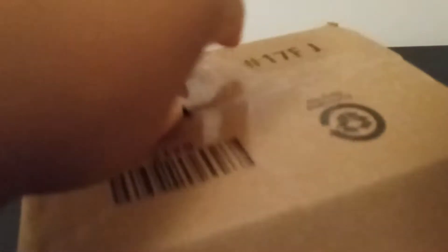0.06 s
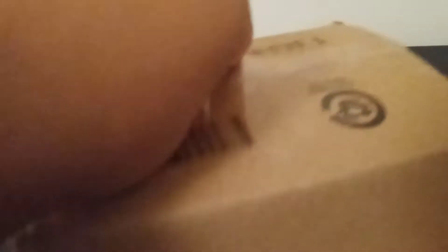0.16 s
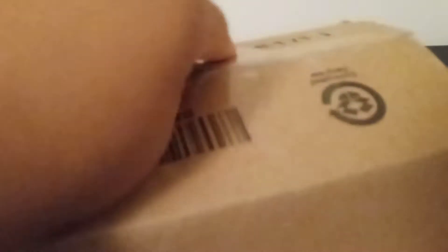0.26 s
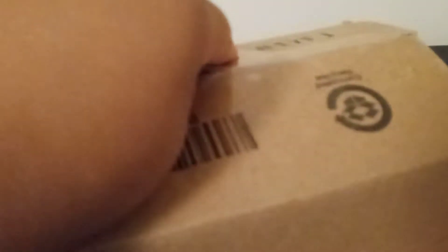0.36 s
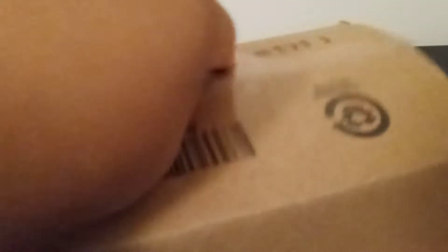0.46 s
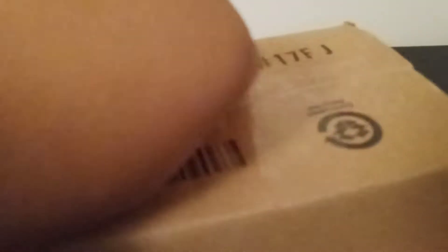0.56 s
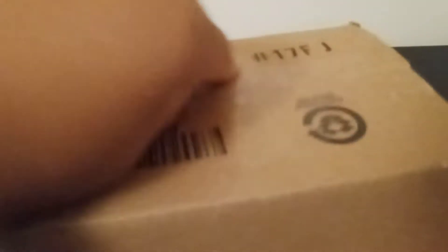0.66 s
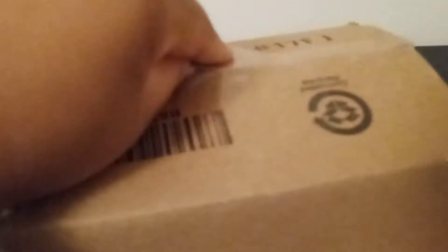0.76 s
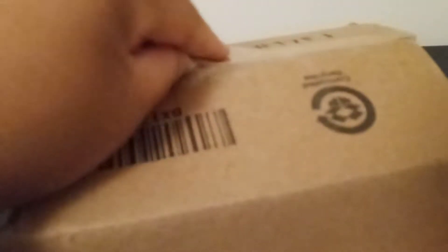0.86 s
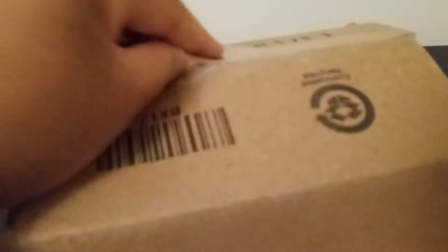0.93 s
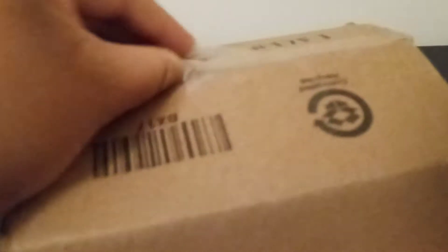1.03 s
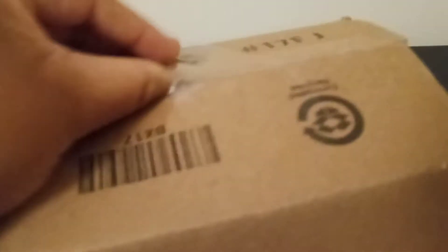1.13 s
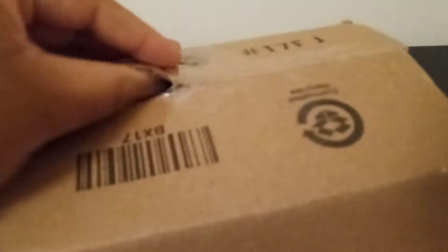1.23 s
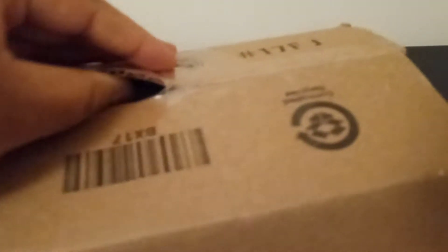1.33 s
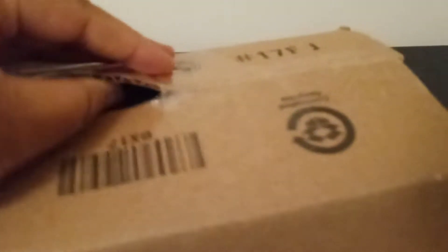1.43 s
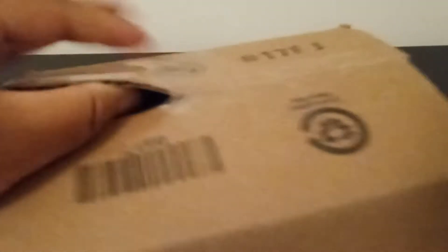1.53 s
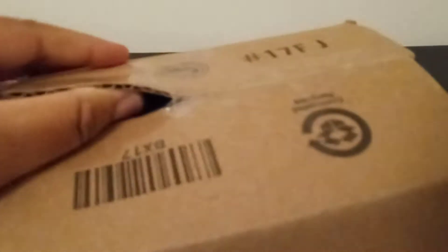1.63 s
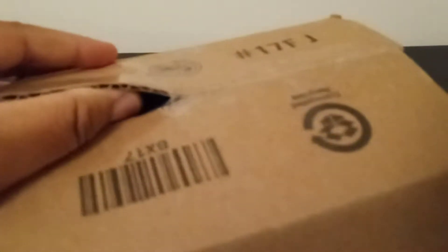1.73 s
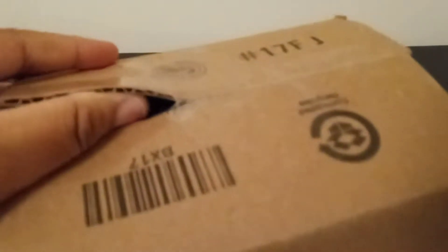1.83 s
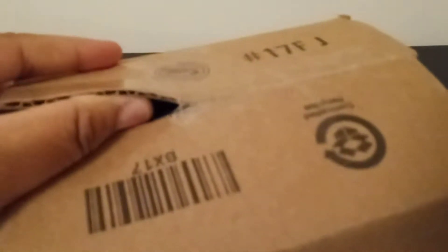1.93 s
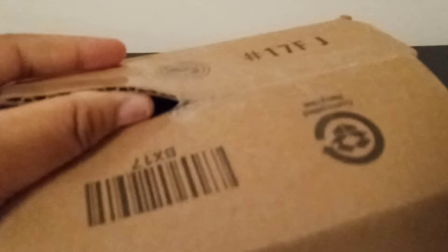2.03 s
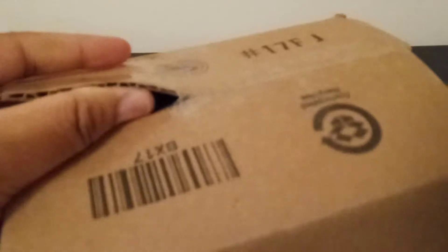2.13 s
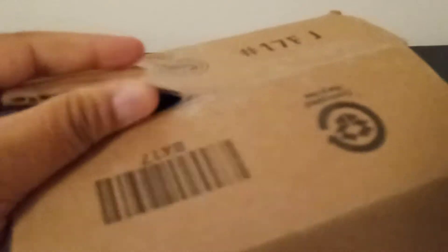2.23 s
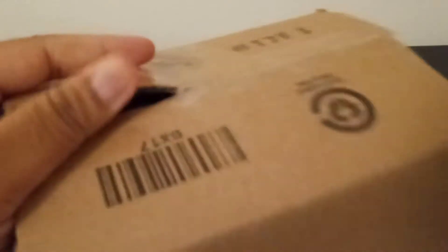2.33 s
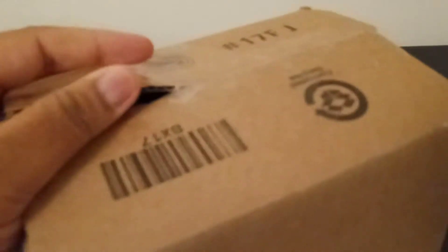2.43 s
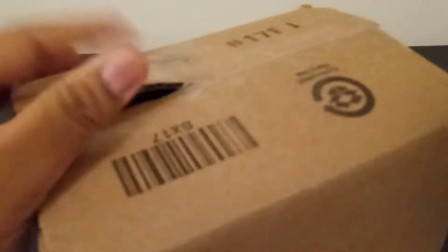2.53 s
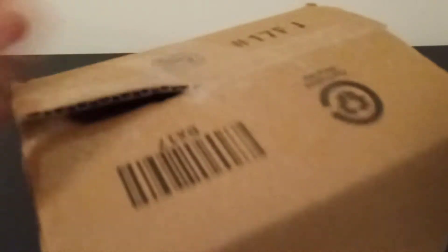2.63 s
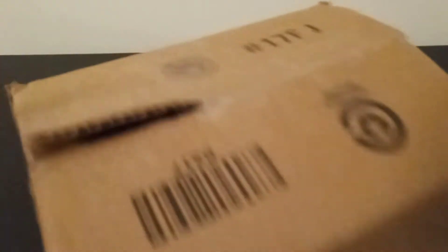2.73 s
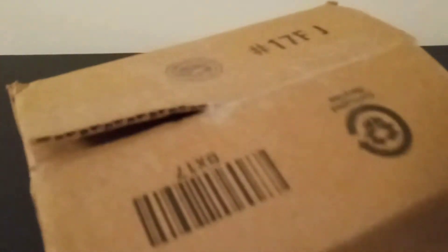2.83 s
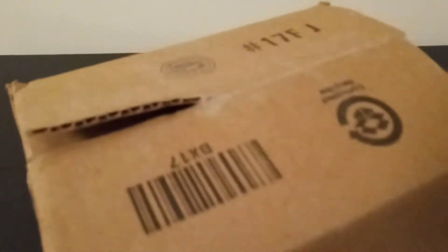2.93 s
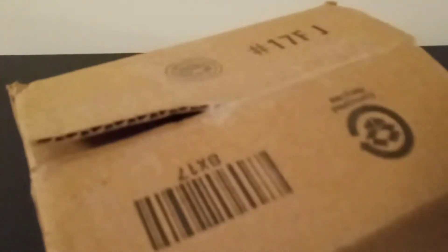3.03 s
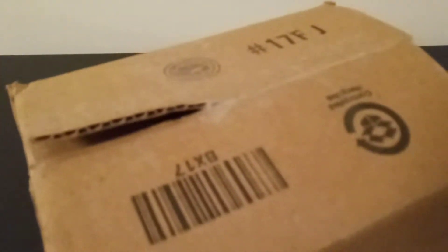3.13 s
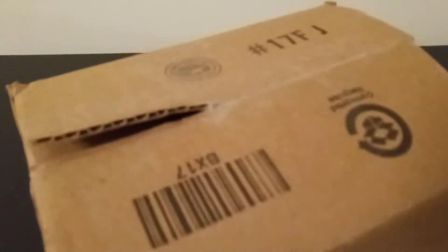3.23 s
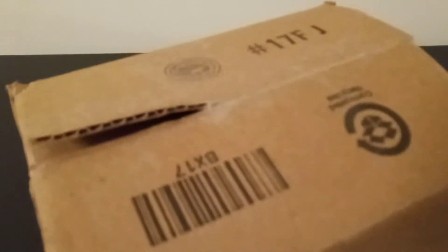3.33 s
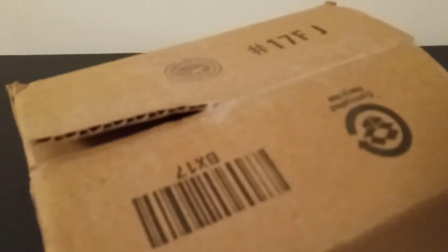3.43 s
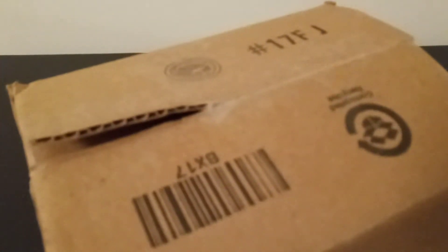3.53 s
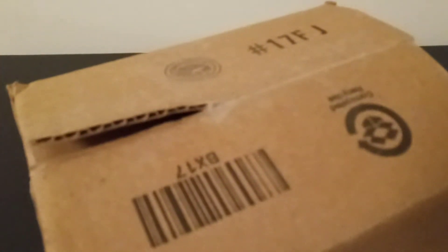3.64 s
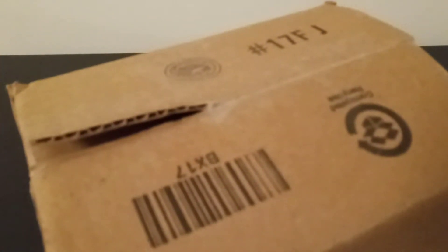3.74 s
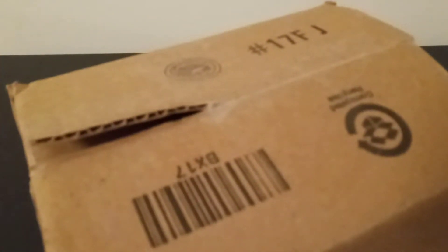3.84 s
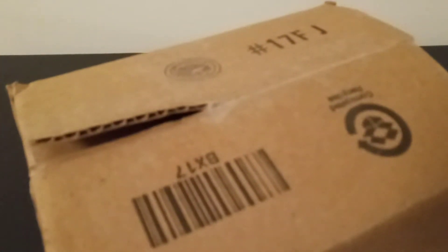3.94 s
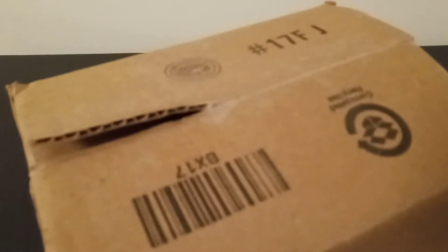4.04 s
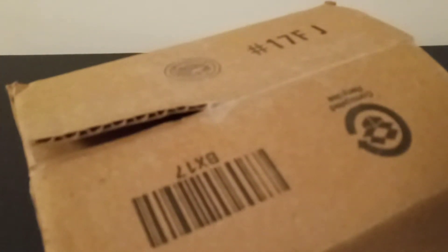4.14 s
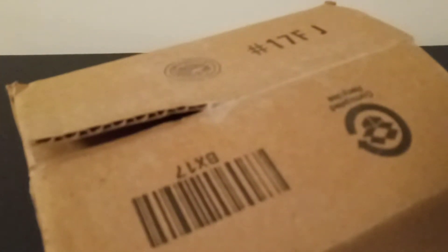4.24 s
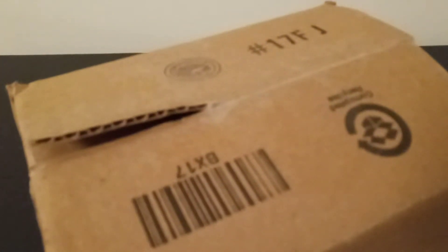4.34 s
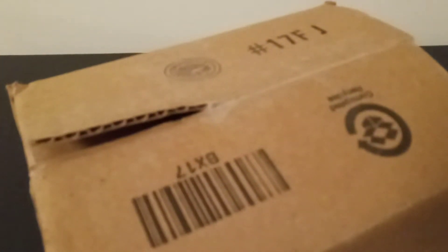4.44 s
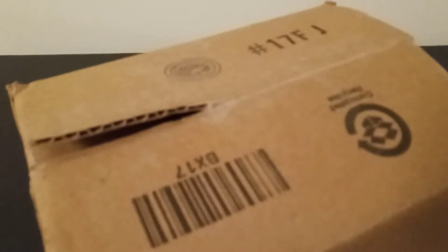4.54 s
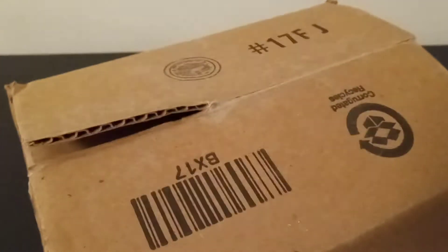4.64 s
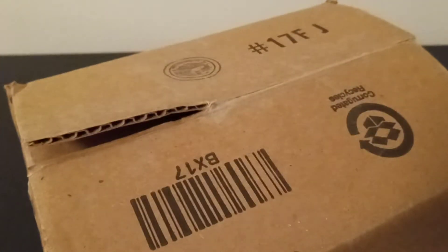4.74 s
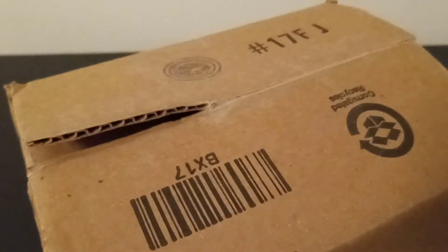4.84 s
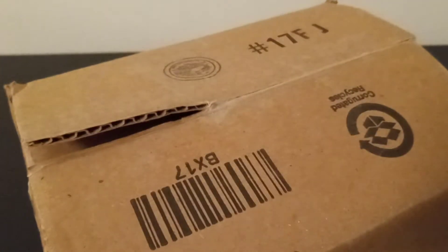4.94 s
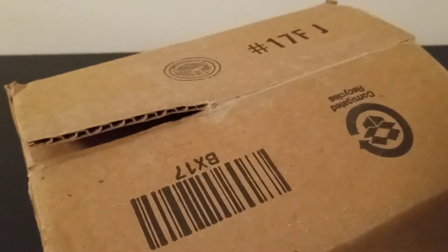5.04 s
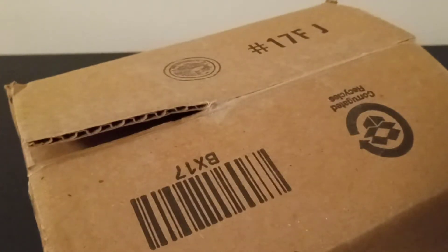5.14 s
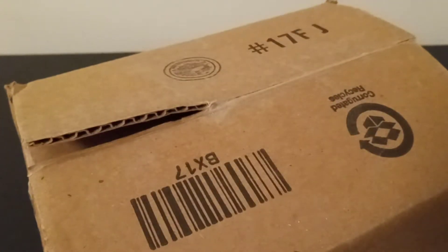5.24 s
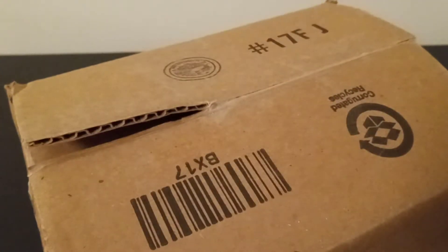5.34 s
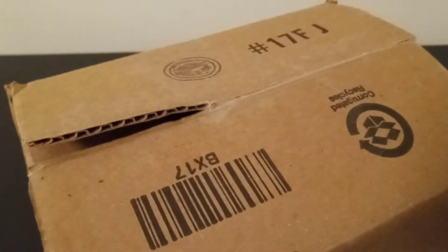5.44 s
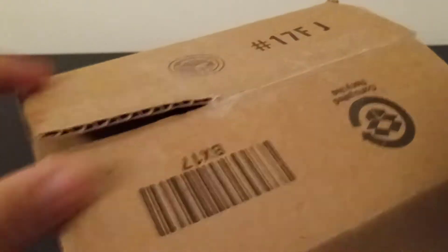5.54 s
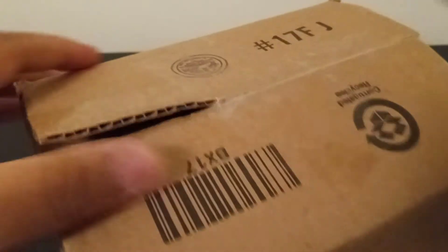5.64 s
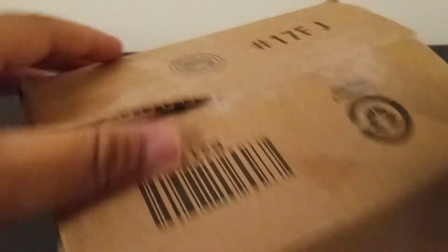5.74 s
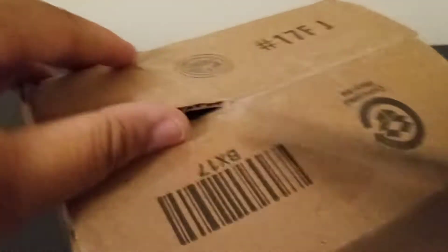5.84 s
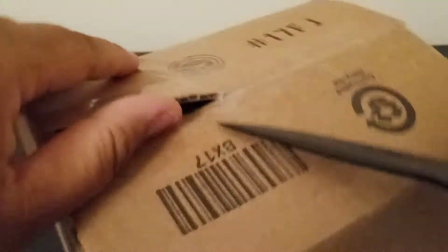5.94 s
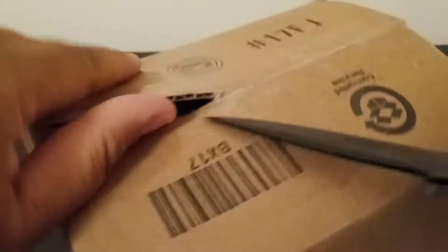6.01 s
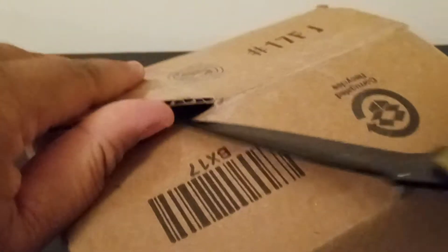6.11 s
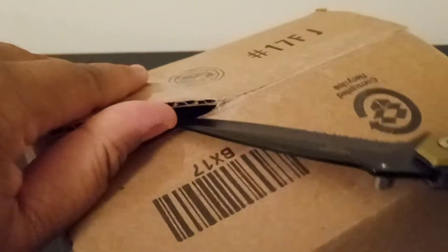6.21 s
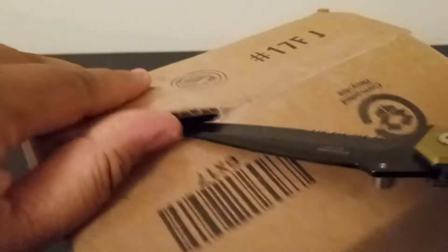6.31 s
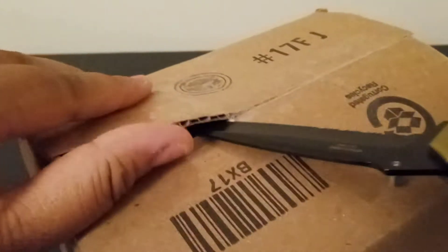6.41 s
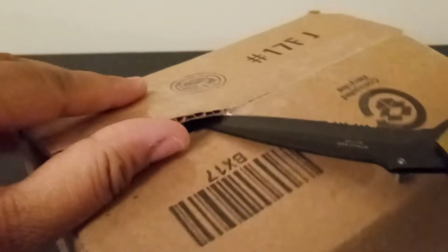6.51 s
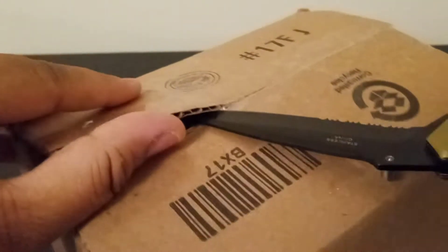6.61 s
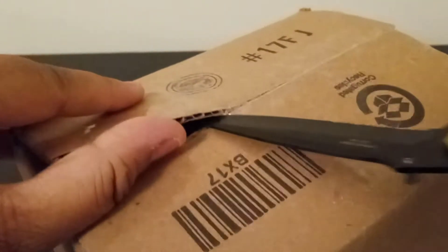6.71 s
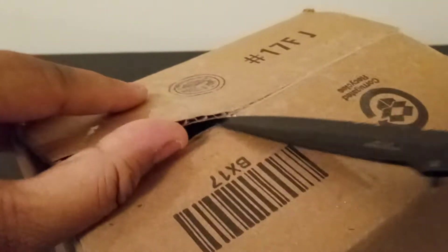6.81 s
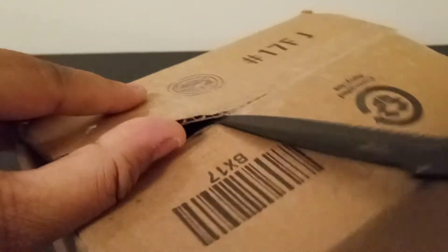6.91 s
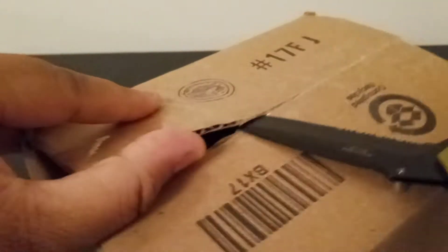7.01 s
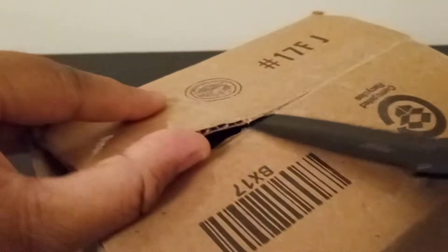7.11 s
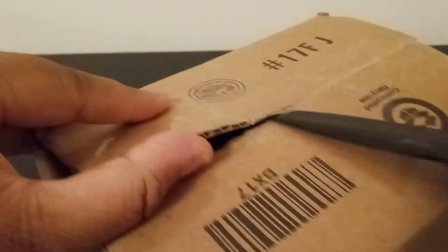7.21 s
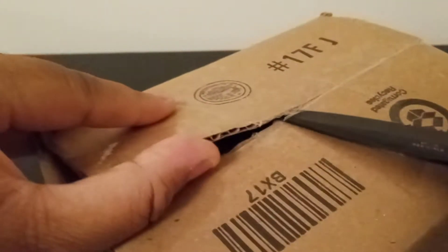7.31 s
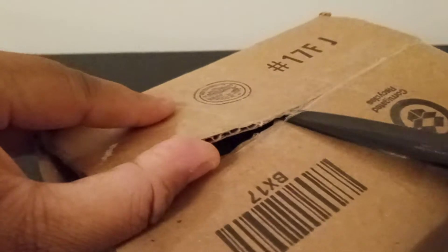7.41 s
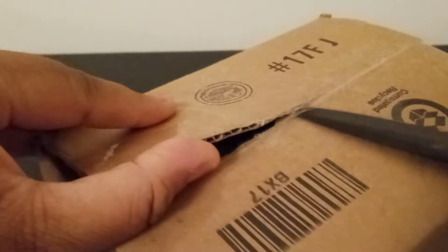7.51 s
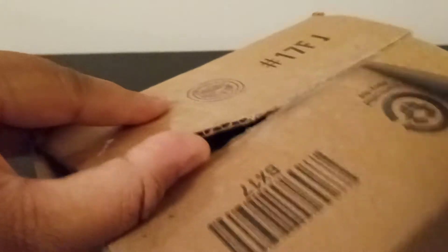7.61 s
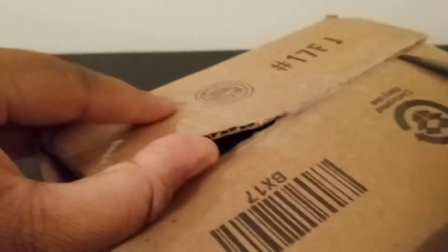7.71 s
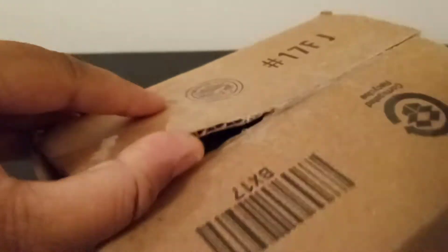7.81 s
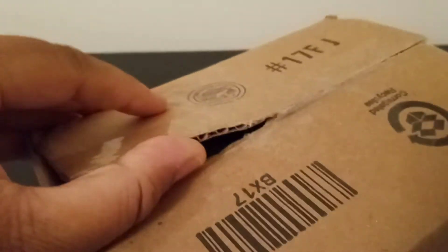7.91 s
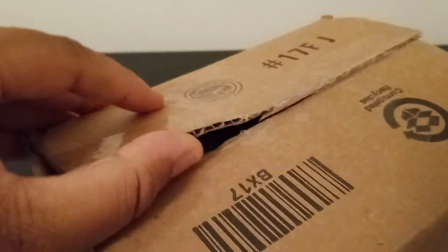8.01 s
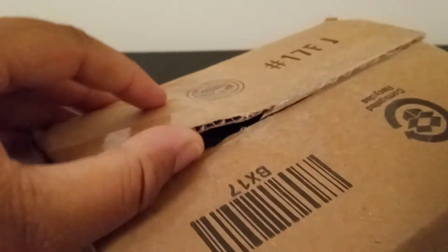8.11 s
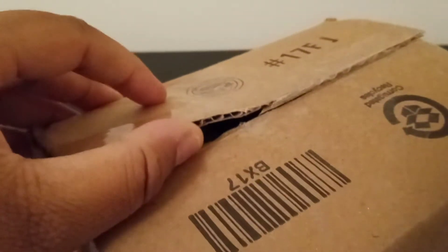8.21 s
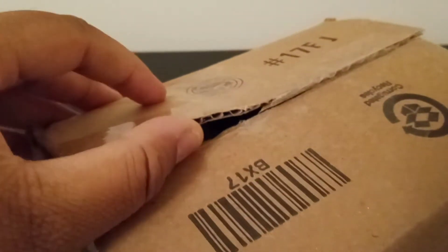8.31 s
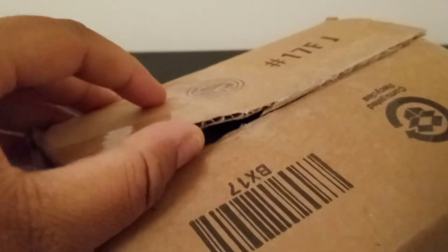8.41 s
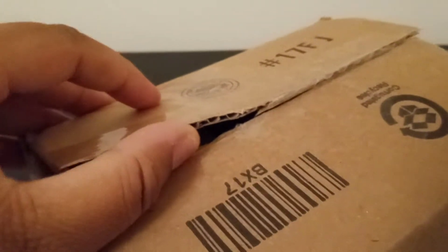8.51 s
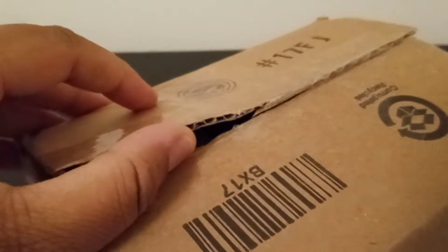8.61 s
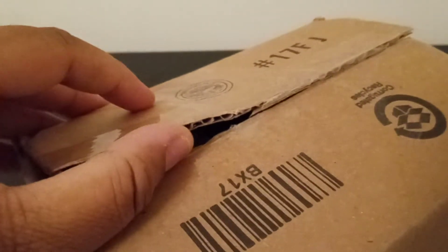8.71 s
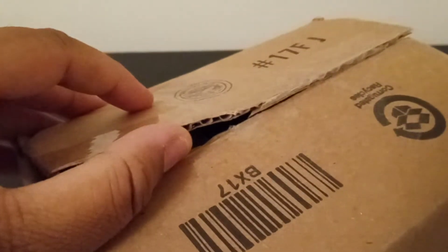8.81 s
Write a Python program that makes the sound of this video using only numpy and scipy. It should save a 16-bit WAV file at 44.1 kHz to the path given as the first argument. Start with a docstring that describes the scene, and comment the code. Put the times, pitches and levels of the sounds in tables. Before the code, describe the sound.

Close, dry cardboard rubbing with crackly snaps and hollow thuds, a near-silent gap, a metallic knife click, short ripping cuts, and a final knock on a table.

```python
"""A hollow cardboard box is rubbed, knocked and prised at its taped flaps, close by in a small room.
Sliding is a stream of random grains, each knock or snap a noise burst, and resonators ring as the box walls.
After a pause with faint rustling a folding knife clicks open, locks, and saws the tape in short strokes;
then it is laid on a ringing table top. The room adds a soft tail, the microphone a peak in the treble."""
import sys
import numpy as np
from scipy import signal
from scipy.fft import rfft, irfft
from scipy.io import wavfile
from scipy.ndimage import uniform_filter1d

SR = 44100
rng = np.random.default_rng(int(sys.argv[2]) if len(sys.argv) > 2 else 0)


def to_wav(s):
    """Save 16-bit WAV."""
    ch = np.atleast_2d(s).T  # columns
    pcm = np.round(np.clip(ch, -1, 1) * 32767)  # PCM
    wavfile.write(sys.argv[1], SR, pcm.astype(np.int16))


N = 390726
TIME = np.arange(N) / SR
HIT_SIZE = 4096  # samples in a short sound and in a filter
HIT_WINDOW = int(.01 * SR)  # samples over which the energy of a short sound is counted

# Skin, card and blade slide on each other.
# Each row: start in seconds, length in seconds, box rumble in dB, hiss in dB before HISS_TRIM_DB.
SLIDE_STROKES = [(0.0, 0.082, -39.5, -38), (0.088, 0.11, -45.5, -45), (0.24, 0.049, -48, -45),
                 (0.274, .11, -42.5, -40), (0.478, 0.051, -55.5, -57), (0.519, 0.058, -41.5, -43),
                 (0.584, 0.065, -41.5, -39.5), (0.68, 0.059, -50, -43.5), (0.772, 0.042, -42.5, -45.5),
                 (0.844, 0.072, -47, -49), (0.957, 0.093, -52, -52), (1.069, 0.055, -46, -44.5),
                 (1.154, 0.033, -49, -45), (1.199, .1, -40.5, -39), (1.322, 0.12, -47.5, -43.5),
                 (1.461, 0.15, -51, -47.5), (1.601, 0.089, -41.5, -44), (1.751, 0.12, -54, -57.5),
                 (2.016, 0.03, -45, -61), (2.23, 0.037, -43.5, -51), (2.316, 0.053, -37.5, -40),
                 (2.419, 0.081, -37, -45), (2.52, 0.12, -47, -47.5), (2.816, 0.099, -60, -58.5),
                 (5.581, 0.019, -41, -36.5), (5.697, 0.15, -59, -49), (5.831, 0.069, -44, -44.5),
                 (5.913, 0.036, -40.5, -50), (5.979, 0.11, -45, -43.5), (6.101, 0.087, -56, -40),
                 (6.188, .04, -39, -43), (6.252, 0.051, -48.5, -46.5), (6.344, 0.11, -46.5, -45.5),
                 (6.515, 0.038, -47.5, -46.5), (6.596, 0.14, -55, -51), (6.771, 0.037, -49.5, -54),
                 (6.856, 0.19, -54, -54), (7.016, 0.056, -33, -36), (7.118, 0.075, -48, -46),
                 (7.184, 0.018, -38.5, -34), (7.273, 0.079, -43.5, -42), (7.39, .08, -53, -53),
                 (7.491, 0.038, -49.5, -40), (7.523, 0.04, -38, -32), (7.626, 0.12, -44, -39),
                 (7.747, 0.1, -36, -35.5), (7.893, 0.29, -49, -55.5)]
HISS_TRIM_DB = -2.5
# Every slide grips, eases off a little as it goes on, and dies away when the hand lets go.
GRIP_S, SAG_DB_PER_S, RELEASE_DB_PER_S = .015, 20, 228
# Modes of the box walls and the air inside. Each row: frequency in Hz, bandwidth in Hz, gain in dB.
BOX_MODES = [(138, 30, -28), (297, 40, -12), (343.4, 38, 2), (387, 130, 0), (484, 91, -0.5), (535, 200, 0),
             (640, 81, -4), (808, 200, -1), (1086, 360, -6.5), (1380, 140, -11.5), (1524, 68, -7.5),
             (2190, 310, -10.5)]
# Spectrum of the rubbing hiss. Each row: frequency in Hz, gain in dB.
RUB_SPECTRUM = [(200, -43), (850, -18.5), (1250, -5.5), (1800, 3.5), (2800, -2.5), (4200, 2.5), (6000, -2),
                (9000, -2.5), (12000, -2), (16000, -0.5)]
# Spectrum of tearing tape and fibres. Each row: frequency in Hz, gain in dB.
TEAR_SPECTRUM = [(500, -18), (1200, 8.5), (1700, 13.5), (2700, 0), (4000, 8), (6000, 1), (9000, 4.5),
                 (12000, 2), (16000, 0.5)]

# Spectrum of the still air. Each row: frequency in Hz, gain in dB.
AIR_SPECTRUM = [(30, -27.5), (100, -17), (180, -7.5), (270, -1.5), (550, 3), (900, -2.5), (1600, -7),
                (3000, -12.5), (6000, -7.5), (10000, -11), (16000, -1.5)]
AIR_DB = -64
# Spectrum of the room's tail. Each row: frequency in Hz, gain in dB.
ROOM_SPECTRUM = [(100, -2.5), (300, -1), (600, -2.5), (1500, -0.5), (4000, 5), (8000, 2.5), (16000, -4.5)]

# Fingers and flaps knock on the hollow box.
# Each row: start in seconds, thud in dB, thud centre in Hz, crack in dB, crack decay in seconds.
BOX_KNOCKS = [(0.035, -29.5, 625, -30.5, .006), (0.063, -36.5, 680, -32, .005),
              (0.139, -31, 400, -46, .003), (0.23, -29, 383, -50, .0015), (0.316, -27.5, 505, -42.5, .006),
              (0.332, -34.5, 360, -61, .002), (0.591, -37.5, 590, -43, .008),
              (0.627, -34.5, 470, -46, .004), (0.868, -40.5, 700, -53, .008),
              (1.057, -40.5, 268, -42, .013), (1.383, -28.5, 400, -42, .003),
              (1.576, -33, 503, -40.5, .005), (2.019, -35.5, 1070, -36.5, .003),
              (2.227, -30.5, 484, -48, .0025), (2.309, -21.5, 910, -28, .003),
              (2.601, -28.5, 1230, -34, .005), (2.663, -44.5, 910, -56, .003),
              (2.824, -51.5, 1000, -69, .003), (2.882, -47.5, 410, -57, .007),
              (5.59, -40.5, 684, -43, .013), (5.619, -36.5, 730, -46.5, .009),
              (5.844, -34, 397, -51.5, .009), (5.948, -18.5, 435, -36, .002),
              (6.079, -38.5, 1120, -52, .006), (6.195, -33, 576, -38.5, .0035),
              (6.355, -40.5, 805, -43, .007), (6.926, -41.5, 497, -65, .005), (6.98, -39, 587, -50.5, .005),
              (7.026, -39.5, 590, -40.5, .004), (7.684, -32.5, 520, -27, .005),
              (8.042, -38, 903, -28.5, .0025), (8.144, -41, 804, -48, .003)]
KNOCK_TILT_DB = -4.5  # slope of a knock's crack, per octave above 1500 Hz
# Tape and paper fibres snap.
# Each row: start in seconds, crack in dB, tilt in dB per octave above 1500 Hz, decay in seconds.
FIBRE_SNAPS = [(0.129, -37, 2, 0.0037), (0.366, -38, -1.5, .0024), (0.437, -32, 5.5, 0.001),
               (0.891, -41, -1.5, .0027), (0.907, -41, -0.5, 0.0034), (1.176, -41, -4, .003),
               (1.2, -36.5, -0.5, 0.0067), (1.233, -30, 7.5, .005), (1.528, -36, 0, 0.0032),
               (1.69, -46.5, 5, 0.0046), (1.761, -43, 1, 0.0041), (2.05, -41.5, -5, 0.0022),
               (2.269, -36.5, 6.5, .0022), (2.679, -41.5, -4, .004), (2.844, -44.5, -4.5, 0.0055),
               (5.419, -42.5, -1, 0.0025), (5.5269, -39, -0.5, 0.00052), (5.68, -35.5, -3.5, 0.0019),
               (5.9986, -32, -6.5, 0.0047), (6.131, -37.5, -3, 0.0049), (6.5876, -33.5, 3, 0.0039),
               (7.222, -34.5, 0.5, .0013), (7.531, -33.5, 0, 0.0084), (7.68, -25, -1.5, 0.011),
               (7.841, -25, 0.5, 0.0052), (7.927, -33.5, 0.5, .006), (7.9958, -31, -0.5, .005),
               (8.0188, -26, -5.5, 0.0032), (8.212, -36.5, 0, 0.0042), (8.263, -42, 0, .007)]
SNAP_THUD_DB, SNAP_THUD_HZ = -23, 1000  # the box's answer to a snap: level under the snap, centre

# A flap sags and pumps the air in the box. Each row: start in seconds, frequency in Hz, level in dB.
AIR_BOOMS = [(1.692, 118, -53.5), (2.599, 140, -47), (5.588, 135, -55), (5.84, 137, -47), (7.811, 131, -46),
             (8.044, 142, -51.5), (8.13, 144, -60)]
# Sharp snaps leave a stiff edge ringing. Each row: start in seconds, frequency in Hz, level in dB.
EDGE_RINGS = [(2.0196, 7500, -39.5), (2.3086, 4150, -23.5), (2.6, 4300, -34.5), (2.601, 1375, -30),
              (2.823, 1540, -52), (2.8473, 2730, -36), (7.9962, 1660, -39), (8.02, 1650, -28),
              (8.0445, 4320, -25), (8.041, 7300, -34), (8.212, 7340, -40)]
EDGE_Q = 7  # centre frequency over bandwidth

# Faint rustles of hands and sleeves.
# Each row: peak time in seconds, level in dB, half length (standard deviation of the power) in seconds.
RUSTLE_STROKES = [(1.945, -58.5, 0.055), (2.154, -67, 0.075), (2.75, -70, 0.046), (3.053, -59, 0.045),
                  (3.185, -63.5, 0.04), (3.286, -61, 0.016), (3.416, -60.5, 0.033), (3.56, -63.5, 0.045),
                  (3.704, -65.5, .015), (3.839, -60, 0.011), (4.274, -62.5, .025), (4.636, -62, 0.054),
                  (4.764, -60, 0.047), (5.5, -56, 0.026), (8.596, -60.5, 0.033)]
# Spectrum of the rustling. Each row: frequency in Hz, gain in dB.
CLOTH_SPECTRUM = [(300, -19), (1200, -18.5), (3000, -9), (4500, 1.5), (7000, -3.5), (10000, -2), (16000, 0)]

# A hiss swells and fades after hard contacts.
# Each row: start in seconds, level in dB before the rise and fade are applied.
HISS_TRAILS = [(2.309, -40.5), (2.601, -51), (5.162, -27), (8.043, -32.5), (8.212, -47.5)]
TRAIL_RISE_S, TRAIL_FADE_DB_PER_S = 0.059, 104.5
# Spectrum of that hiss. Each row: frequency in Hz, gain in dB.
TRAIL_SPECTRUM = [(300, -33), (850, -20.5), (1300, -5), (2000, -3.5), (3200, 2), (4200, 3.5), (6000, 2),
                  (9000, -1.5), (12000, -3), (16000, 2)]

# Clicks of the knife's pivot and lock. Each row: start in seconds, level in dB, decay in seconds.
KNIFE_CLICKS = [(5.1123, -30.5, 0.00057), (5.13, -29, .0022), (5.137, -25, .0028), (5.1455, -27.5, .004),
                (5.1557, -28, .0018), (5.16, -17.5, .0044), (5.168, -24.5, .005)]
# Spectrum of a steel click. Each row: frequency in Hz, gain in dB.
STEEL_SPECTRUM = [(300, -47), (1000, -35), (2200, 1), (3200, -1.5), (4000, 7), (4800, 6), (6300, -1.5),
                  (8500, 1), (11000, -1), (16000, 6.5)]
LOCK_S, LOCK_DB = 5.162, -20
# Spectrum of the locking clack. Each row: frequency in Hz, gain in dB.
LOCK_SPECTRUM = [(25, -44), (60, -29), (120, -6.5), (270, 4.5), (480, -2), (600, -7), (800, 1.5),
                 (1000, -11), (1400, 6.5), (1900, -12), (4000, -32.5)]

# Blade strokes through the tape. Each row: peak time in seconds, tearing in dB, box rumble in dB,
# half length of the tearing (standard deviation of its power) in seconds.
BLADE_STROKES = [(7.293, -31, -33.5, 0.013), (7.6203, -24.5, -29.5, 0.0048), (7.666, -42.5, -36.5, 0.0083),
                 (7.68, -28.5, -34.5, 0.0084), (7.7367, -21, -22.5, 0.005), (7.748, -30.5, -34.5, 0.0079),
                 (7.821, -24.5, -37.5, 0.0083)]
# Spectrum of the whole lid, dragged by the blade. Each row: frequency in Hz, gain in dB.
DRAG_SPECTRUM = [(80, -20.5), (130, 4.5), (190, -4.5), (260, 4.5), (330, 2.5), (430, -5.5), (530, 3),
                 (1000, -7), (2500, -2.5)]

# The knife is laid down, handle, then blade. Each row: start in seconds, knock in dB, click in dB.
KNIFE_TOUCHES = [(8.7571, -23.5, -43), (8.7615, -31.5, -36.5)]
# Modes of the table top. Each row: frequency in Hz, gain in dB, time to fade by 60 dB in seconds.
TABLE_MODES = [(416, -7.5, 0.09), (640, 7, 0.038), (740, 2.5, 0.034), (930, 2.5, 0.062),
               (1090, -4.5, 0.025), (1340, -2, 0.038), (1586, 2.5, .036), (1960, -1, 0.034),
               (2260, -0.5, 0.04), (2660, -18, 0.075)]

PORT_HZ, PORT_WIDTH_HZ, PORT_GAIN = 7950, 1100, 2.7  # microphone port; the gain is linear
TOP_HZ = 15950  # upper limit of the microphone


def undb(db):
    """Amplitude gain is ten to the power of a twentieth of the decibels."""
    return 10 ** (np.asarray(db) / 20)


def unit(x):
    """Normalise to unit power: rms 1."""
    return x / np.sqrt(np.mean(x ** 2))


def add(track, s, sound, db):
    """Superpose a short sound whose energy, spread over 10 ms, has the given level."""
    i = int(s * SR)
    part = sound[:N - i] * undb(db) / np.sqrt(np.sum(sound ** 2) / HIT_WINDOW)
    track[i:i + len(part)] += part


def shape(x, gain_db):
    """Minimum-phase filtering: folding the cepstrum makes a causal filter of the given gain over Hz."""
    hz = np.maximum(np.fft.rfftfreq(HIT_SIZE, 1 / SR), 1)
    cepstrum = irfft(np.log(undb(gain_db(hz))))
    cepstrum[1:HIT_SIZE // 2] *= 2
    cepstrum[HIT_SIZE // 2 + 1:] = 0
    response = irfft(np.exp(rfft(cepstrum)))
    return signal.fftconvolve(x, response)[:len(x)]


def colour(x, points):
    """Spectral shaping: the gain is interpolated over log frequency between (Hz, dB) points."""
    f, db = np.transpose(points)
    return shape(x, lambda hz: np.interp(np.log(hz), np.log(f), db))


def resonate(x, hz, width):
    """A single resonance: a band-pass with gain 1 at its centre."""
    return signal.lfilter(*signal.iirpeak(hz, hz / width, fs=SR), x)


def walk(rate):
    """Slow random variation: held random values, smoothed, with a spread near 1."""
    k = max(int(SR / rate), 1)
    held = np.repeat(rng.standard_normal(N // k + 1), k)
    return 1.22 * uniform_filter1d(held, k)[:N]


def grains(rate, spread_db):
    """Stick-slip as shot noise: fibres let go in random clicks, most small and a few large."""
    chance, size, sign = rng.random(N), rng.exponential(size=N), rng.standard_normal(N)
    click_size = undb(spread_db * np.minimum(size, 5))
    return unit((chance < rate / SR) * np.sign(sign) * click_size)


def swells(times, dbs, widths):
    """Powers of separate strokes add: a gain curve made of bell-shaped strokes."""
    power = 0
    for s, db, width in zip(times, dbs, widths):
        power = power + undb(2 * db) * np.exp(-.5 * np.minimum(((TIME - s) / width) ** 2, 100))
    return np.sqrt(power)


def box(force, scatter_db=0):
    """Modal superposition: the place of contact, drawn at random, sets how strongly each mode answers."""
    modes = 0
    for hz, width, db in BOX_MODES:
        answer_db = db + scatter_db * rng.standard_normal()
        modes = modes + undb(answer_db) * resonate(force, hz, width)
    return signal.sosfilt(signal.butter(3, 150, "high", fs=SR, output="sos"), modes)


def burst(length, after_db, after_s, spike_db=0):
    """Brittle fracture: one break, a rush of tiny fractures that dies fast, then weak reflections."""
    t = TIME[:HIT_SIZE]
    first_break = undb(spike_db) * np.exp(-t / 0.00027)
    fractures = np.exp(-t / max(length, 1e-4))
    reflections = undb(after_db) * np.exp(-t / after_s)
    onset = 1 - np.exp(-t / 0.00009)
    return rng.standard_normal(HIT_SIZE) * (first_break + fractures + reflections) * onset


def smear(x, decay_s, scatter_db, count=5):
    """Multipath scattering: grains bounce in the stiff sheet, on paths that change as the contact moves."""
    scattered = 0
    for _ in range(count):
        bounces = rng.standard_normal(HIT_SIZE) * np.exp(-TIME[:HIT_SIZE] / decay_s)
        path = signal.oaconvolve(x, bounces / np.sqrt(np.sum(bounces ** 2)))[:N]
        scattered = scattered + path * np.cos(np.pi * walk(10))
    return x + undb(scatter_db) * scattered * np.sqrt(2 / count)


def slide_gain(start, length):
    """Envelope of friction: grip, a slowly sagging hold, and exponential release."""
    t = np.maximum(TIME - start, 0)
    fall_db = SAG_DB_PER_S * t + RELEASE_DB_PER_S * np.maximum(t - length, 0)
    return np.minimum(t / GRIP_S, 1) * undb(-np.minimum(fall_db, 200))


def rubbing():
    """Stick-slip friction: fine grains hiss, coarser ones shake the box, lone fibres snap."""
    grip = walk(130)
    force = grains(rate=3500, spread_db=2.0) * undb(2 * grip)
    rumble = 0
    for hz, width, db in BOX_MODES:
        # as the fingers travel, they favour now one mode, now another
        favour = undb(db + 3.9 * walk(7))
        rumble = rumble + favour * resonate(resonate(force, hz, 1.28 * width), hz, hz)

    fibres = smear(grains(rate=12000, spread_db=3.0) * undb(1.3 * grip), decay_s=0.004, scatter_db=-2.0)
    snap = burst(0.0004, after_db=-20, after_s=0.0074)
    snaps = signal.fftconvolve(grains(rate=27, spread_db=3.5), snap)[:N]
    # now and then the torn edge catches and gives a duller crackle
    catch = burst(0.0016, after_db=-19, after_s=0.006)
    catches = signal.fftconvolve(grains(rate=60, spread_db=1.0), catch)[:N]
    hiss = unit(colour(unit(fibres) + undb(-8) * unit(snaps), RUB_SPECTRUM))
    hiss = hiss + undb(-12) * unit(colour(catches, TEAR_SPECTRUM))

    rumble_power, hiss_power = np.zeros(N), np.zeros(N)
    for start, length, rumble_db, hiss_db in SLIDE_STROKES:
        power = slide_gain(start, length) ** 2
        rumble_power += power * undb(rumble_db) ** 2
        hiss_power += power * undb(hiss_db) ** 2
    return unit(rumble) * np.sqrt(rumble_power) + unit(hiss) * undb(HISS_TRIM_DB) * np.sqrt(hiss_power)


def still_air():
    """Stationary background noise: random noise with a fixed spectrum and level."""
    return undb(AIR_DB) * unit(colour(rng.standard_normal(N), AIR_SPECTRUM))


def room(x, t60=0.52, build_s=0.034, wet_db=-17.0):
    """Diffuse reverberation: convolution with a noise tail that builds up and decays exponentially."""
    t = TIME[:SR]
    build_up = 1 - np.exp(-(t / build_s) ** 2)
    decay = np.exp(-np.log(1000) * t / t60)
    tail = colour(rng.standard_normal(SR), ROOM_SPECTRUM) * build_up * decay
    return undb(wet_db) * signal.fftconvolve(x, tail / np.sqrt(np.sum(tail ** 2)))[:N]


def contacts():
    """Impact excitation: each contact cracks the paper skin and thuds the box's modes."""
    knocks = [(s, crack_db, KNOCK_TILT_DB, length, thud_db, thud_hz)
              for s, thud_db, thud_hz, crack_db, length in BOX_KNOCKS]
    snaps = [(s, crack_db, tilt_db, length, crack_db + SNAP_THUD_DB, SNAP_THUD_HZ)
             for s, crack_db, tilt_db, length in FIBRE_SNAPS]
    cracks, thuds = np.zeros(N), np.zeros(N)
    for s, crack_db, tilt_db, length, thud_db, thud_hz in knocks + snaps:
        def crack_gain(hz):
            low_cut = -20 * np.log10(1 + (1200 / hz) ** 3)
            return tilt_db * np.log2(np.maximum(hz, 1500) / 1500) + low_cut

        def thud_gain(hz):
            return -8 * np.minimum(np.abs(np.log2(hz / thud_hz)), 4)  # dB, falling away from the centre

        fracture = burst(length, after_db=-15, after_s=0.015, spike_db=6.5)
        add(cracks, s, shape(fracture, crack_gain), crack_db)
        push = signal.unit_impulse(HIT_SIZE) + 0.06 * burst(length, after_db=-6.5, after_s=0.017)
        add(thuds, s, shape(box(push, scatter_db=0.5), thud_gain), thud_db)
    return cracks + thuds


def ringing():
    """Free vibration: the enclosed air booms when a flap sags; stiff edges buzz briefly after a snap."""
    out, t = np.zeros(N), TIME[:HIT_SIZE]
    for s, hz, db in AIR_BOOMS:
        add(out, s, np.sin(2 * np.pi * hz * t) * t ** 2 * np.exp(-t / 0.0068), db)
    for s, hz, db in EDGE_RINGS:
        push = burst(0.0014, after_db=-14.5, after_s=0.012, spike_db=2)
        add(out, s, resonate(resonate(push, hz, hz / EDGE_Q), hz, hz / 2), db)
    return out


def rustling():
    """Friction noise of cloth and skin: dense fine grains in soft brushing strokes."""
    brushing = grains(rate=18000, spread_db=3.5) * undb(2.2 * walk(36))
    return unit(colour(brushing, CLOTH_SPECTRUM)) * swells(*np.transpose(RUSTLE_STROKES))


def trailing():
    """Exponential decay: a grainy hiss swells just after each hard contact and fades evenly in dB."""
    power = np.zeros(N)
    for s, db in HISS_TRAILS:
        t = np.clip(TIME - s, 0, 2)
        rise = 1 - np.exp(-(t / TRAIL_RISE_S) ** 2)
        power += (undb(db - TRAIL_FADE_DB_PER_S * t) * rise) ** 2
    return unit(colour(grains(rate=20000, spread_db=1.0), TRAIL_SPECTRUM)) * np.sqrt(power)


def knife():
    """Damped impacts: the blade swings out with bright steel clicks, damped at once by the hand."""
    out = np.zeros(N)
    for s, db, length in KNIFE_CLICKS:
        tick = burst(length, after_db=-27, after_s=.008)
        add(out, s, colour(tick, STEEL_SPECTRUM), db)
    return out


def lock():
    """Impact on a damped body: the blade hits its stop, a dead clack in the gripped handle."""
    out = np.zeros(N)
    push = signal.unit_impulse(HIT_SIZE) + .06 * burst(.003, after_db=-20, after_s=.005)
    add(out, LOCK_S, colour(push, LOCK_SPECTRUM), LOCK_DB)
    return out


def cutting():
    """Jerky fracture: the edge bursts tape and fibres in quick jerks, and drags the box along."""
    s, tear_db, rumble_db, width = np.transpose(BLADE_STROKES)
    jerks = undb(2.96 * walk(450))
    fibres = smear(grains(rate=12000, spread_db=4.5) * jerks, decay_s=0.0024, scatter_db=-3.0)
    tear = unit(colour(fibres, TEAR_SPECTRUM))
    rumble = unit(colour(box(grains(rate=3000, spread_db=2.0) * jerks), DRAG_SPECTRUM))
    # the heavy lid keeps shaking for longer than the tape tears
    return tear * swells(s, tear_db, width) + rumble * swells(s, rumble_db, 1.4 * width)


def laying_down():
    """Modal excitation: the knife lands in two quick touches and chatters on the ringing table top."""
    out = np.zeros(N)
    band = signal.butter(3, [450, 2600], "band", fs=SR, output="sos")
    for s, knock_db, click_db in KNIFE_TOUCHES:
        chatter = burst(0.004, after_db=-12.0, after_s=0.043, spike_db=9)
        modes = 0
        for hz, db, t60 in TABLE_MODES:
            # a mode that fades by 60 dB in t60 is ln(1000) / (pi t60) wide
            modes = modes + undb(db) * resonate(chatter, hz, np.log(1000) / (np.pi * t60))
        add(out, s, signal.sosfilt(band, modes + .25 * chatter), knock_db)
        click = burst(0.0041, after_db=-18, after_s=.01)
        add(out, s, colour(click, STEEL_SPECTRUM), click_db)
    return out


def scene():
    """Superposition: handling with its room tail, then lock, hiss trails and air without one, in mono."""
    handling = rubbing() + contacts() + ringing() + rustling() + knife() + cutting() + laying_down()
    mono = handling + room(handling) + lock() + trailing() + still_air()
    return np.array([mono, mono])


def record(dry):
    """Port resonance lifts the treble; saturation rounds the loudest peaks; a low-pass cuts off the top."""
    voiced = dry + PORT_GAIN * resonate(dry, PORT_HZ, PORT_WIDTH_HZ)
    rounded = .75 * np.tanh(voiced / .75)
    return signal.sosfilt(signal.ellip(10, .2, 70, TOP_HZ, fs=SR, output="sos"), rounded)


dry = scene()
out = record(dry)
to_wav(out)
```